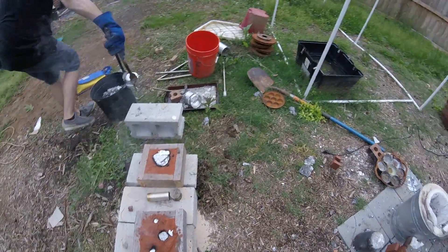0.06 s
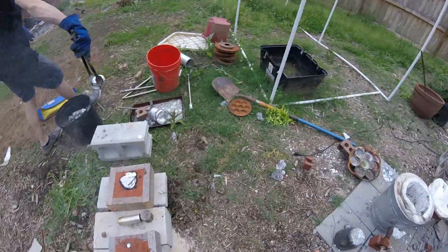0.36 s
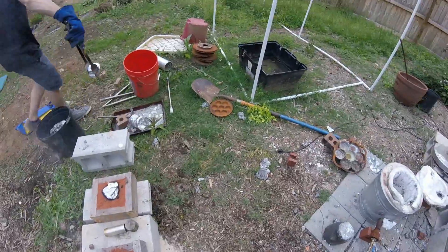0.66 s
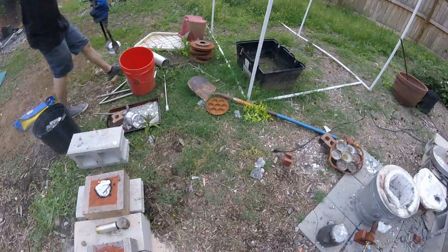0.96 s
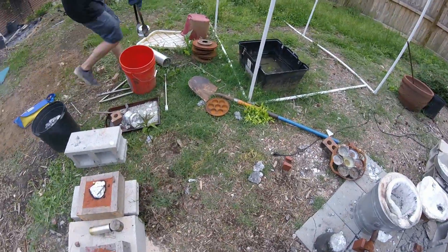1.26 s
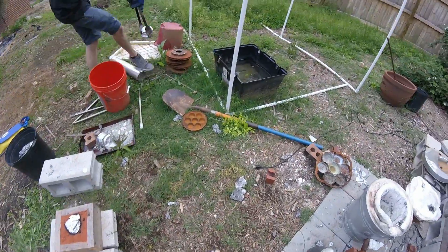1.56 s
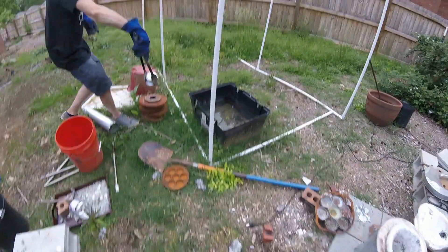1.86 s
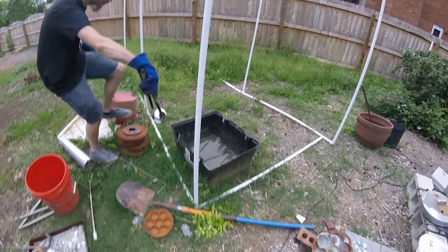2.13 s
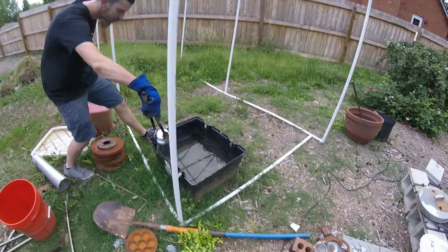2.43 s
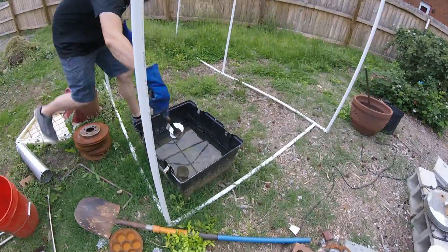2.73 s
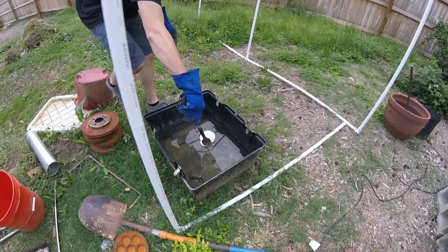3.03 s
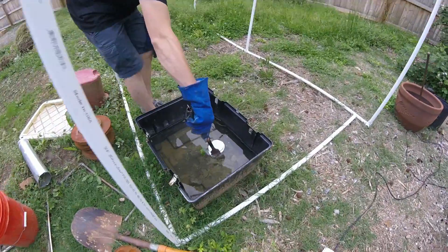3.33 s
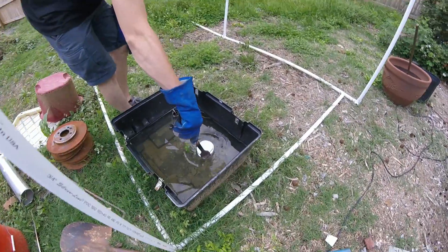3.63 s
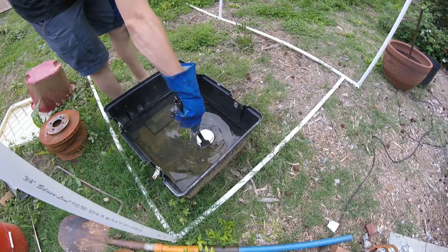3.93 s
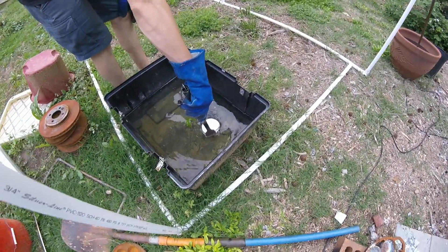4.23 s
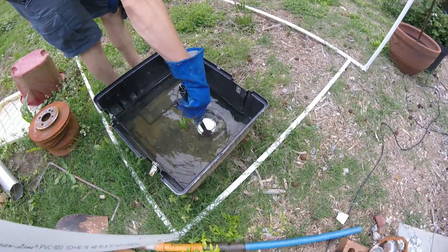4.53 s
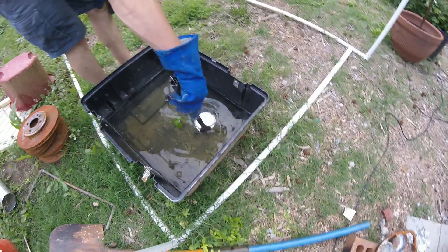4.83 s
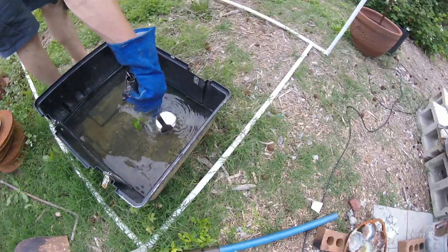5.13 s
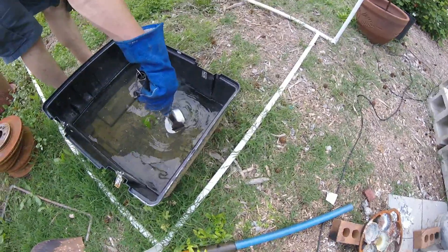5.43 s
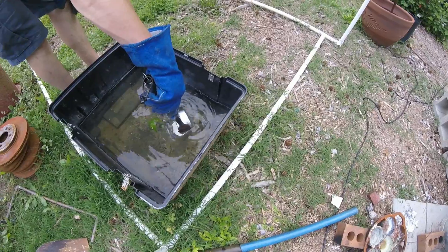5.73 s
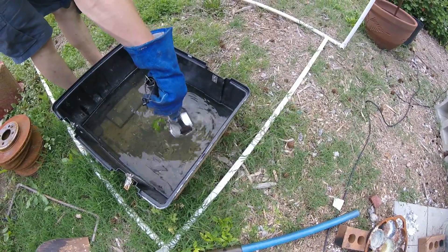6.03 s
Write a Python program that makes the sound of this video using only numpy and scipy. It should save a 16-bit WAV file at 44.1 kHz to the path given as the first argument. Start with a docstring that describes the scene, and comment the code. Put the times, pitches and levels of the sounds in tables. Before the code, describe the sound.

Footsteps and a hollow clonk cross a yard, then hot metal dunked in a tub of water squelches, sizzles and glugs.

```python
"""A low outdoor rumble, with feet knocking and scuffing across a back yard and birds calling far off.
A hot casting is being carried in tongs; on the way a hollow thing is kicked and rings with a clonk.
The casting is lowered into a plastic tub of water: pockets of steam swell and squelch in falling notes,
the boil sizzles on the metal as a spray of tiny pops, and the stirred water glugs."""
import sys
import numpy as np
from scipy import signal
from scipy.fft import rfft, irfft
from scipy.io import wavfile

SR = 44100
rng = np.random.default_rng(int(sys.argv[2]) if len(sys.argv) > 2 else 0)


def dump_mix(stems):
    """Bounce the given channels to the path in sys.argv[1] as a 16-bit WAV at rate SR."""
    frames = np.atleast_2d(stems).T  # one column per channel
    limited = np.clip(frames, -1, 1)  # hard clip at full scale
    pcm = np.round(limited * 32767).astype(np.int16)
    wavfile.write(sys.argv[1], SR, pcm)


N = 272538

# bed of distant traffic and air: f/Hz, relative level/dB
YARD_SPECTRUM = [(20, -2.5), (38, -5), (55, 1), (80, -4.5), (125, -8.5), (180, -17.5), (300, -25.5),
                 (600, -28.5), (1200, -33.5), (2500, -37.5), (4000, -41.5), (5200, -51.5), (8000, -39),
                 (15000, -36)]
# dull knocks and glugs: t/s, f/Hz, level/dB, t60/s
KNOCKS_AND_GLUGS = [ (.04, 403, -42, .04), (1.725, 370, -38, .015), (1.848, 450, -20, .014),
                    (3.224, 480, -33, .02), (4.492, 337, -33, .08), (4.518, 460, -35, .05),
                    (4.536, 160, -24, .04), (4.538, 412, -29.5, .05), (4.575, 92, -31, .3),
                    (4.659, 460, -28, .03), (4.689, 450, -31.5, .03), (4.725, 385, -28.5, .035),
                    (4.771, 385, -39, .06), (4.902, 440, -37, .04), (4.97, 298, -35, .055),
                    (5.322, 470, -27.5, .076), (5.379, 660, -31, .06), (5.388, 435, -25, .16),
                    (5.542, 450, -27.5, .11)]
# small glugs of stirred water: from t/s, to t/s, f/Hz, level/dB, t60/s
LAPPING = (4.54, 5.06, 290, -45, .08)
# scuffs, ticks and small splashes: t/s, level/dB, t60/s, centre f/Hz
SCUFFS_AND_SPLASHES = [ (.05, -49.5, .53, 390), (.14, -45, .23, 410), (1.2, -48, .09, 1900),
                       (1.834, -44, .03, 1000), (1.88, -49.5, .24, 800), (2.493, -47, .04, 1700),
                       (2.667, -45, .06, 1600), (2.78, -43.5, .15, 1950), (3.023, -36, .016, 1860),
                       (3.362, -46, .12, 1700), (3.381, -39.5, .11, 1250), (3.414, -35.5, .07, 1200),
                       (5.524, -37, .044, 1200), (5.54, -26.5, .029, 1300)]
# faint grit underfoot: from t/s, to t/s, level/dB, t60/s, centre f/Hz
GRIT = (.9, 3.1, -57, .09, 1700)
# one bird's buzzy two-note chirps: t/s, level/dB
CHIRPS = [(.271, -54), (2.36, -56)]
# the notes of a chirp: delay/s, length/s, first f/Hz, last f/Hz, relative level/dB
CHIRP_NOTES = [(0, .035, 3970, 4480, 0), (.038, .072, 3600, 3430, -5)]
# sinking whistles: t/s, length/s, first f/Hz, last f/Hz, level/dB, bend (under 1 drops early, over 1 late)
WHISTLES = [ (.786, .1, 3900, 3520, -63, .6), (1.032, .07, 3700, 3580, -64, .6),
            (2.825, .047, 2780, 2540, -57, 1.7), (3.434, .062, 2830, 2620, -53.5, .6),
            (3.529, .04, 2780, 2670, -59, 2), (3.565, .07, 2410, 2380, -61, 1),
            (4.078, .047, 2920, 2730, -52, .4), (4.177, .054, 3360, 3290, -56, 2),
            (4.724, .046, 3220, 2800, -53.5, 3), (4.761, .043, 2740, 2630, -53.5, .4),
            (6.01, .11, 3150, 2200, -51, 1.5)]
# the higher a bird sings, the more it buzzes: f/Hz, waver/share of pitch
BIRD_BUZZ = [(3300, .015), (3900, .055)]
# modes of the kicked hollow thing: f/Hz, relative level/dB, t60/s
CLONK_MODES = [(244.3, -1.5, 0.3), (465, -7, 0.19), (1180, -23, 0.17), (2900, -32, .2), (3250, -33, 0.17)]
# the kick's crack and the scrape after it: delay/s, level/dB, t60/s, centre f/Hz
KICK_NOISE = [(0, -30, .054, 1100), (.015, -37, .22, 575), (.063, -53, 1.0, 2310)]
# fader ride of the boil on the metal: t/s, level/dB
SIZZLE_LEVEL = [(3.68, -70), (3.8, -51), (4.25, -59), (4.35, -67), (4.46, -50), (4.57, -59), (4.83, -62),
                (4.98, -44.5), (5.47, -46), (5.59, -61), (6.18, -64)]
# tone of the boil: f/Hz, relative level/dB
SIZZLE_SPECTRUM = [(200, -4), (900, -1), (1800, -1.5), (3000, 6.5), (5500, 2.5), (9000, 4.5), (11700, 5),
                   (13000, -3), (15000, -10)]
# steam pockets: t/s, length/s, last f/Hz, note level/dB, hiss level/dB
STEAM_POCKETS = [ (3.773, .05, 4900, -44, -36), (3.801, .051, 2590, -37, -33),
                 (3.833, .039, 2610, -28, -29.5), (3.855, .042, 2390, -28.5, -37),
                 (3.884, .021, 2470, -31, -34), (3.938, .011, 5700, -46, -47.5),
                 (3.951, .054, 1600, -23, -24.5), (4.023, .032, 1230, -25, -34.5),
                 (4.095, .016, 2410, -35, -46), (4.122, .035, 1470, -28, -31.5),
                 (4.575, .019, 2830, -42.5, -41.5), (4.608, .018, 2890, -43.5, -42),
                 (4.927, .042, 1290, -29.5, -33), (5.21, .068, 960, -21.3, -25),
                 (5.328, .045, 1130, -28, -30.5), (5.382, .053, 1075, -30, -41),
                 (5.411, .022, 1060, -29.5, -29.3), (5.438, .018, 3000, -50, -41),
                 (5.534, .014, 1000, -32, -50)]
# a pocket puffs up, slows, then rushes to full size: share of its length, share of its growth
POCKET_GROWTH = [(0, 0), (.36, .32), (.8, .61), (1, 1)]
# envelopes of a pocket's note and hiss, in shares of its length: full level, starts to fade, faded
NOTE_SHAPE = (.43, .81, 1.2)
HISS_SHAPE = (.51, .84, 1.17)
# the microphone port rings near 6.4 kHz and shuts above it: f/Hz, gain/dB
MIC_PORT = [(20, 0.5), (5000, -0.5), (5900, 0.5), (6400, 10), (6700, -4), (7050, -14.5), (8000, -14.5),
            (10300, -16.5), (11500, -15), (15000, -25)]
# the microphone's own hiss: f/Hz, relative level/dB
MIC_HISS = [(3000, -15), (5800, -14.5), (6600, 2.5), (7300, -3), (9000, -8), (10500, -19.5), (13000, -16),
            (15000, -48.5)]


def amp(db):
    """Decibels to gain."""
    return 10 ** (np.asarray(db) / 20)


def unit(x):
    """Scales to rms 1."""
    return x / np.sqrt(np.mean(abs(x) ** 2) + 1e-20)


def eq_gain(curve, size):
    """Gains for an FFT of size samples, from a dB curve joined on a log-frequency axis."""
    hz, db = np.transpose(curve)
    return amp(np.interp(np.log(np.fft.rfftfreq(size, 1 / SR) + 1), np.log(hz + 1), db))


def coloured(x, curve):
    """Shapes x with an EQ curve, at rms 1."""
    return unit(irfft(rfft(x) * eq_gain(curve, len(x)), len(x)))


def add(mix, s, sound):
    """Mixes a sound in at s seconds."""
    part = mix[round(s * SR):][:len(sound)]
    part += sound[:len(part)]


def flutter(size, hz):
    """Smooth random modulation of rms 1, moving at up to about hz."""
    f = np.fft.rfftfreq(size, 1 / SR)
    return unit(irfft(rfft(rng.standard_normal(size)) / (1 + (f / hz) ** 4), size))


def scattered(start, end, count):
    """Loosely spaced cues: t/s, random strength around 0."""
    times = start + (end - start) * (np.arange(count) + rng.random(count)) / count
    return zip(times, rng.standard_normal(count))


def yard_rumble(level_db=-42.5, drift_db=.4):
    """A slowly drifting bed of distant traffic and soft air."""
    return amp(level_db + drift_db * flutter(N, 4)) * coloured(rng.standard_normal(N), YARD_SPECTRUM)


def knock(hz, db, t60, attack_s=.0038, sag=.136, body_hz=145, thud_hz=49, size=12000):
    """A short hollow note that sags in pitch, over a soft low body and a deep thud."""
    t = np.arange(size) / SR
    pitch = hz * (1 + sag * (np.exp(-t / .0084) - .5) + .072 * flutter(size, 190))
    phase = 2 * np.pi * np.cumsum(pitch) / SR + .59 * flutter(size, 280)
    note = np.sin(phase) * amp(2 * flutter(size, 200))
    envelope = np.minimum(t / attack_s, 1) * amp(-60 * np.maximum(t - attack_s, 0) / t60)
    body = np.sin(2 * np.pi * body_hz * rng.uniform(.89, 1.3) * t) * amp(-10 - 60 * t / .081)
    thud_envelope = np.minimum(t / .015, 1) * amp(-60 * np.maximum(t - .025, 0) / .13)
    thud = np.sin(2 * np.pi * thud_hz * t) * thud_envelope
    thud_db = 3 - 190 * t60  # the longer a knock rings, the less it thuds
    return amp(db) * (envelope * note + body + amp(thud_db) * thud)


def knocks_and_glugs(cutoff_hz=670):
    """Feet knock and stirred water glugs, all dulled; bigger laps are lower and louder."""
    out = np.zeros(N)
    start, end, hz, db, t60 = LAPPING
    laps = [(s, hz * np.exp(-.15 * strength), db + 1.5 * strength, t60)
            for s, strength in scattered(start, end, count=10)]
    for s, *hit in KNOCKS_AND_GLUGS + laps:
        add(out, s, knock(*hit))
    return signal.sosfilt(signal.butter(2, cutoff_hz, fs=SR, output="sos"), out)


def scuff(db, t60, hz, grain_db=1.5, size=20000):
    """A grainy puff of broad noise; the longer a scrape, the softer it starts."""
    t = np.arange(size) / SR
    hump = [(hz / 8, -14), (hz / 3, -2), (hz, 0), (hz * 2, -7), (hz * 5, -22), (hz * 20, -42)]
    noise = coloured(rng.standard_normal(size), hump)
    attack_s = max(.0008, .093 * (t60 - .06))
    return amp(db - 60 * t / t60 + grain_db * flutter(size, 260)) * np.minimum(t / attack_s, 1) * noise


def scuffs_and_splashes():
    """Feet scuff over faint grit on the walk; small splashes follow at the tub."""
    out = np.zeros(N)
    start, end, db, t60, hz = GRIT
    grit = [(s, db + 1.5 * strength, t60, hz) for s, strength in scattered(start, end, count=9)]
    for s, *puff in SCUFFS_AND_SPLASHES + grit:
        add(out, s, scuff(*puff))
    return out


def bird_note(length, first_hz, last_hz, db, bend=1, size=8192):
    """A gliding whistle; a fast waver makes the high ones buzz."""
    progress = np.minimum(np.arange(size) / SR / length, 1)
    glide_hz = first_hz * (last_hz / first_hz) ** (progress ** bend)
    waver = np.interp(first_hz, *np.transpose(BIRD_BUZZ)) * flutter(size, 270)
    envelope = np.sqrt(abs(np.sin(np.pi * progress))) * amp(db + 2 * flutter(size, 60))
    return envelope * np.sin(2 * np.pi * np.cumsum(glide_hz * (1 + waver)) / SR)


def birds():
    """Two-note chirps and single whistles."""
    out = np.zeros(N)
    for s, db in CHIRPS:
        for delay, length, first_hz, last_hz, note_db in CHIRP_NOTES:
            add(out, s + delay, bird_note(length, first_hz, last_hz, db + note_db))
    for s, *note in WHISTLES:
        add(out, s, bird_note(*note))
    return out


def clonk(kick_s=1.597, ring_db=-25, ring_lag_s=.004, attack_s=.0011):
    """One kick cracks, rings the hollow body's modes and scrapes it along."""
    out, t = np.zeros(N), np.arange(SR // 2) / SR
    ring = sum(amp(db - 60 * t / t60) * np.sin(2 * np.pi * hz * t) for hz, db, t60 in CLONK_MODES)
    add(out, kick_s + ring_lag_s, amp(ring_db) * ring * np.minimum(t / attack_s, 1))
    for delay, *puff in KICK_NOISE:
        add(out, kick_s + delay, scuff(*puff))
    return out


def sizzle(pops_per_s=7000, flicker_db=1.2):
    """Water boils on the hot metal in a fine crackle of uneven pops."""
    pops = (rng.random(N) < pops_per_s / SR) * rng.standard_normal(N)
    pops *= amp(2 * np.minimum(rng.exponential(1, N), 5))  # a few stand out
    level_db = np.interp(np.arange(N) / SR, *np.transpose(SIZZLE_LEVEL))
    return coloured(pops, SIZZLE_SPECTRUM) * amp(level_db + flicker_db * flutter(N, 43))


def pocket_envelope(age, shape, edge_db=-35):
    """Swell, hold and fade; age is in shares of the pocket's length."""
    full, fading, faded = shape
    return amp(np.interp(age, [0, full, fading, faded, 2 * faded - fading], [edge_db, 0, 0, edge_db, -80]))


def steam_pocket(length, last_hz, note_db, hiss_db, birth_hz=6100, spread_hz=2050, spit_db=2, size=6144):
    """A tiny pocket swells and its note sinks as 1 / radius; collapsing bubbles hiss above that note."""
    age = np.arange(size) / SR / length
    radius = 1 + (birth_hz / last_hz - 1) * np.interp(age, *np.transpose(POCKET_GROWTH))
    hz = birth_hz / radius * (1 + .04 * flutter(size, 244))
    phase = 2 * np.pi * np.cumsum(hz) / SR
    # loud pockets sing most clearly; faint ones are only a band of noise round the note
    roughness = np.interp(note_db, [-34, -22], [.97, .45])
    width_hz = .17 * np.sqrt(birth_hz * last_hz)
    band = flutter(size, width_hz) * np.cos(phase) + flutter(size, width_hz) * np.sin(phase)
    note = np.sqrt(2 * (1 - roughness ** 2)) * np.cos(phase) + roughness * band
    # one-sided noise, shifted up to ride on the falling note
    above_hz = np.fft.rfftfreq(size, 1 / SR)
    slope = above_hz / (above_hz + 250) / np.hypot(1, above_hz / spread_hz) ** 1.5
    skirt = np.fft.ifft(rfft(rng.standard_normal(size)) * slope, size)
    spit = amp(spit_db * np.tanh(flutter(size, 580)))
    hiss = unit((skirt * np.exp(1j * phase)).real * spit)
    return (amp(note_db) * pocket_envelope(age, NOTE_SHAPE) * note
            + amp(hiss_db) * pocket_envelope(age, HISS_SHAPE) * hiss)


def squelches():
    """Steam pockets form in flurries on the sunken casting."""
    out = np.zeros(N)
    for s, *pocket in STEAM_POCKETS:
        add(out, s, steam_pocket(*pocket))
    return out


def echoes(x, t60, predelay_s, taps_per_s=2000):
    """Thin scatter from the ground, fence and house."""
    t = np.arange(SR // 2) / SR
    taps = rng.standard_normal(len(t)) * (rng.random(len(t)) < taps_per_s / SR)
    taps *= amp(-60 * t / t60) * (t > predelay_s)
    return signal.fftconvolve(x, taps / np.linalg.norm(taps))[:N]


def scene():
    """A mono mix: the foreground almost dry, the birds far and wetter, the rumble underneath."""
    near = squelches() + sizzle() + knocks_and_glugs() + scuffs_and_splashes() + clonk()
    far = birds()
    near += amp(-16.5) * echoes(near, t60=.12, predelay_s=.0092)
    far += amp(-6) * echoes(far, t60=.37, predelay_s=.012)
    return (near + far + yard_rumble())[None]


def record(dry, hiss_db=-65.5, cutoff_hz=14400):
    """The microphone's port colour and hiss, then a steep high cut."""
    heard = irfft(rfft(dry, 2 * N) * eq_gain(MIC_PORT, 2 * N))[:, :N]
    heard += amp(hiss_db) * coloured(rng.standard_normal(N), MIC_HISS)
    low_pass = signal.firwin(255, cutoff_hz, window=("kaiser", 9), fs=SR)
    return signal.oaconvolve(heard, low_pass[None], "same")


dry = scene()
out = record(dry)
dump_mix(out)
```